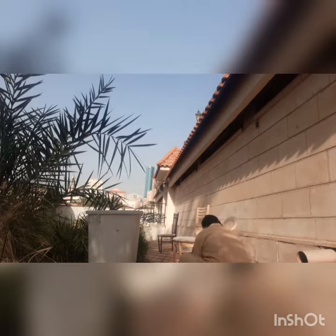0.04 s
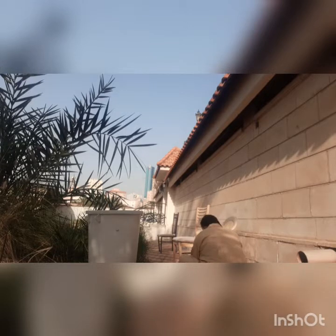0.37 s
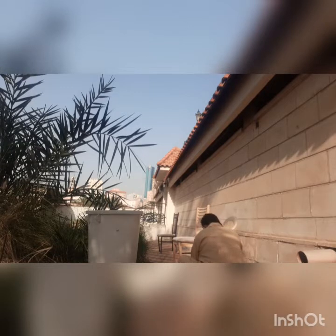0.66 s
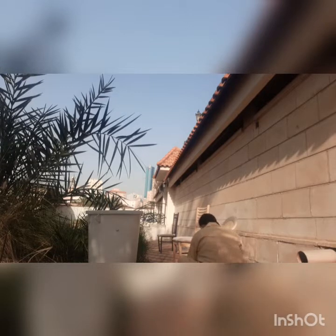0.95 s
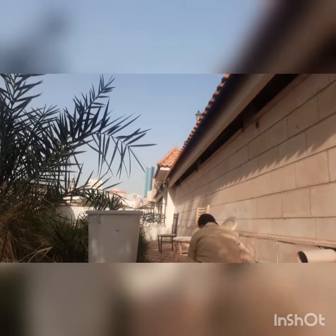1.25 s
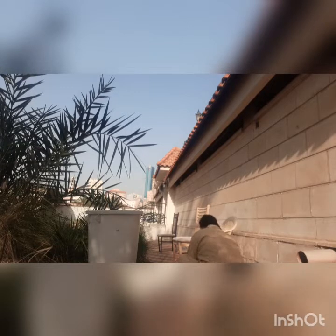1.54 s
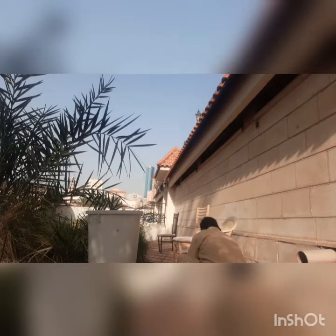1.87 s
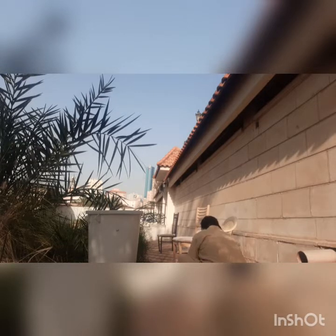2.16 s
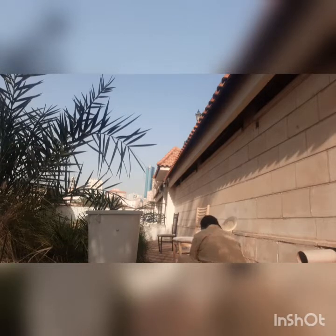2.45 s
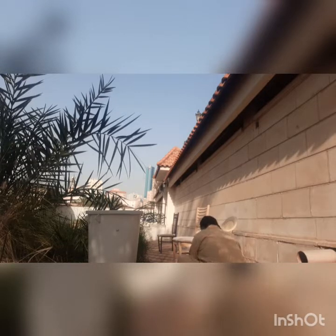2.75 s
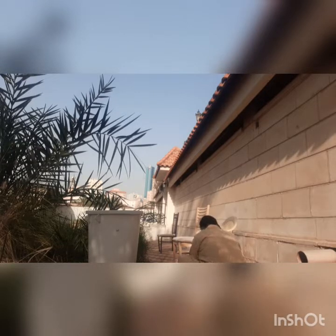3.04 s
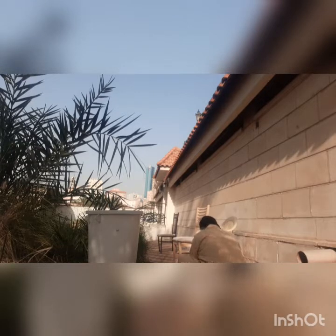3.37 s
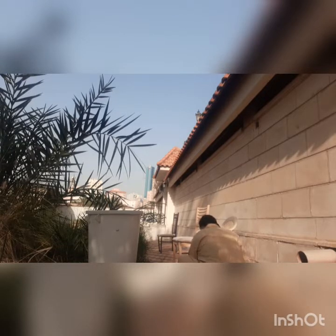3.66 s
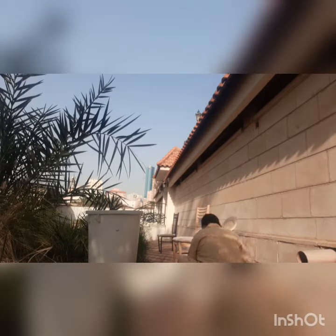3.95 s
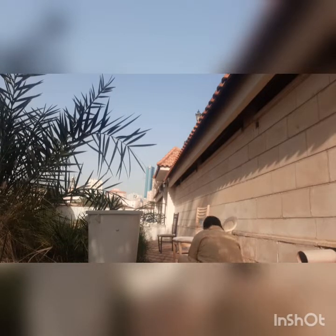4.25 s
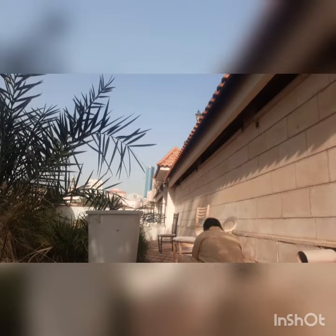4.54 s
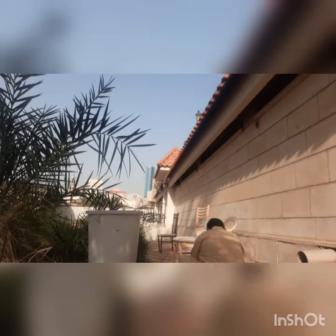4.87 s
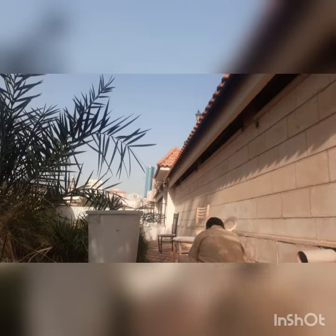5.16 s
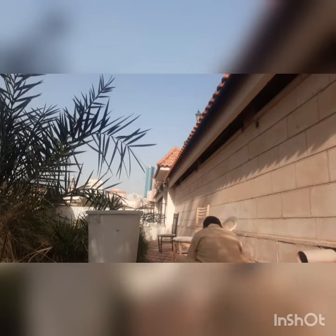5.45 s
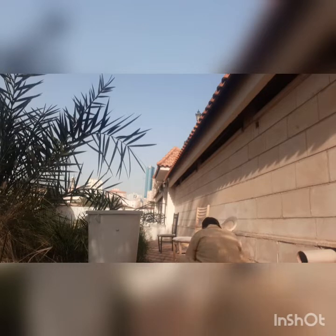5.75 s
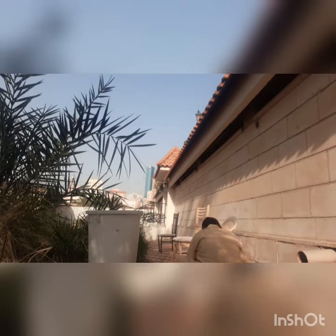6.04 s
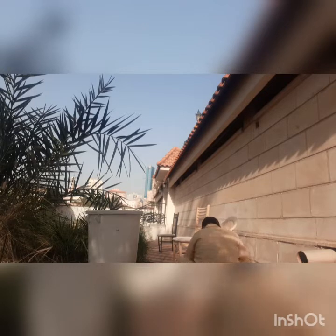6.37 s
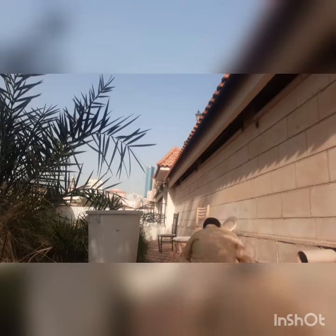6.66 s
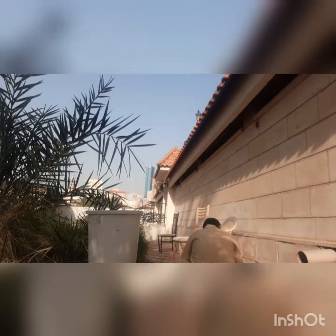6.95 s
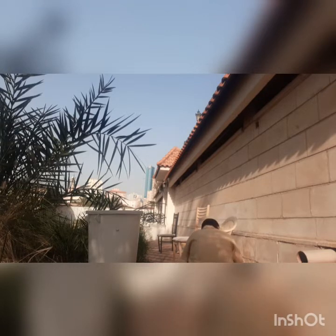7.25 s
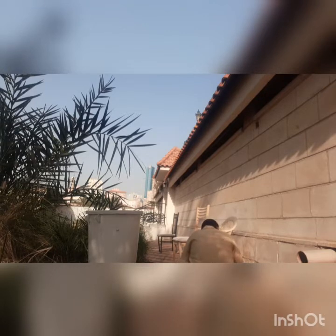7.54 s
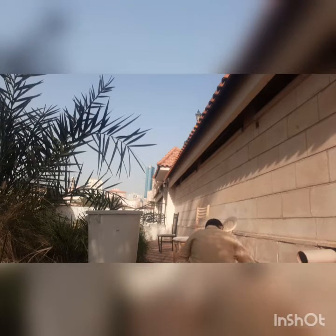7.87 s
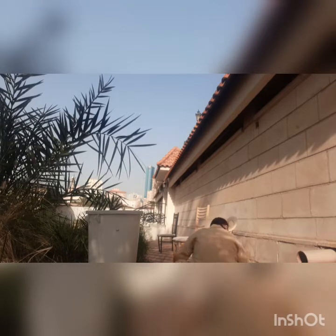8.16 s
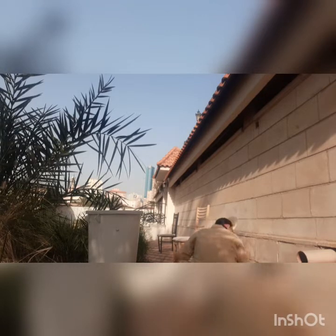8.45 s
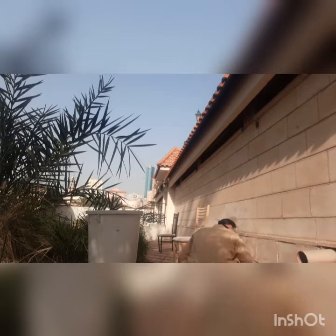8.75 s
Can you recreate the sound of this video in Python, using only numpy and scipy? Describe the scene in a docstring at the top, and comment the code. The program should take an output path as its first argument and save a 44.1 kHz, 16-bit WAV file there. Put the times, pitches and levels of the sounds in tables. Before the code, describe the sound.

Hand shears cut grass and plants on a walled terrace, a few metres from the microphone. Each snip is a crunch of stalks with a steel clack, and sometimes the blades scrape with a brief squeak. The cuts come in two short runs, then more sparsely, with leaves rustling and single stalks snapping between them. Small birds chirp further off, over a cooling unit's low hum and a distant town rumble.

```python
"""Hand shears snip grass and plants on a walled terrace, a few metres from a stereo microphone.
Each cut is a crunch of breaking stalks and a clack of steel; now and then the blades scrape and sing.
Between cuts the hands rustle through leaves and snap single stalks. Further off, small birds chirp
among the houses, over the hum of a cooling unit and the low rumble of the distant town."""
import sys
import numpy as np
from scipy import signal
from scipy.fft import rfft, irfft
from scipy.io import wavfile
from scipy.ndimage import uniform_filter1d

SR = 44100
rng = np.random.default_rng(int(sys.argv[2]) if len(sys.argv) > 2 else 0)


def store_wav(level_fs):
    """Save 16-bit WAV to argv[1]."""
    pcm = np.round(np.clip(np.atleast_2d(level_fs), -1, 1) * 32767)
    wavfile.write(sys.argv[1], SR, pcm.T.astype(np.int16))


N = 396900
TIME = np.arange(N) / SR
LEFT_LAG_SAMPLES = 9  # direct sound reaches the right side of the microphone first


def undb(db):
    """Decibels to gain."""
    return 10 ** (np.asarray(db) / 20)


def unit(x):
    """Scale to an rms of one."""
    return x / np.sqrt(np.mean(x ** 2) + 1e-20)


def fade(t, t60):
    """Exponential decay that loses 60 dB in t60 seconds."""
    return np.exp(-np.log(1000) * t / t60)


def add(track, start_s, sound):
    """Mix a sound into a track."""
    i = max(int(start_s * SR), 0)
    track[..., i:i + sound.shape[-1]] += sound[..., :N - i]


def colour(x, points):
    """Shape a sound by a spectrum of (frequency_hz, gain_db) points."""
    hz, db = np.transpose(points)
    bins_hz = np.maximum(np.fft.rfftfreq(x.shape[-1], 1 / SR), 1)
    gain = undb(np.interp(np.log(bins_hz), np.log(hz), db))
    return irfft(rfft(x) * gain, x.shape[-1])


def band(x, low_hz, high_hz):
    """Band-pass filter."""
    return signal.sosfilt(signal.butter(3, [low_hz, high_hz], "band", fs=SR, output="sos"), x)


def resonance(x, hz, width_hz):
    """One resonant band, with a gain of one at its centre."""
    return signal.lfilter(*signal.iirpeak(hz, hz / width_hz, fs=SR), x)


def walk(rate_hz, size=N):
    """Smooth random wandering with a spread near one."""
    hold = int(SR / rate_hz)
    steps = np.repeat(rng.standard_normal(size // hold + 1), hold)
    return unit(uniform_filter1d(uniform_filter1d(steps, hold), hold)[:size])


def crackle(size, per_s, spread_db):
    """Tiny clicks at random moments, a few of them much larger than the rest."""
    place, sign, strength = rng.random((3, size), dtype=np.float32)
    hit, out = place < per_s / SR, np.zeros(size)
    click_db = spread_db * np.minimum(-np.log(1 - strength[hit]), 4)
    out[hit] = (sign[hit] - .5) * undb(click_db)
    return unit(out)


def space(x, early_db, early_s, near_db, near_t60, far_db, far_t60):
    """Direct sound, a cluster off floor and nearest wall, echoes between walls, then a duller tail."""
    t = TIME[:SR]
    early = rng.standard_normal((2, SR)) * np.clip((early_s - t) / 0.0046, 0, 1)
    near = rng.standard_normal((2, SR)) * fade(t, near_t60)
    tail_spectrum = [(300, -3.5), (1500, -5.5), (4200, -2.0), (7000, -8.0), (16000, -10.0)]
    far = colour(rng.standard_normal((2, SR)), tail_spectrum)
    far *= fade(t, far_t60) * np.minimum(t / 0.018, 1)
    response = undb(early_db) * unit(early) + undb(near_db) * unit(near) + undb(far_db) * unit(far)
    response /= np.sqrt(SR)
    response[0, LEFT_LAG_SAMPLES] += 1
    response[1, 0] += 1
    return signal.fftconvolve(x[None], unit(response) / np.sqrt(SR), axes=1)[:, :N]


def terrace(x):
    """The walls around the hands; each call draws a new pattern of reflections."""
    return space(x, early_db=-2.0, early_s=0.013, near_db=-1, near_t60=0.2, far_db=-21.0, far_t60=0.74)


# Tones of the cooling unit: pitch_hz, level_db
HUM_TONES = [(97, -59), (112, -55.5), (144, -54.5), (191.3, -52)]
# Contour of their shared swell, taken about its mean and scaled by swell_depth: time_s, level_db
HUM_SWELL = [(0.0, -43), (0.22, -42), (2.96, -43), (3.81, -54), (5.24, -49), (6.54, -45.5), (7.6, -49),
             (9.0, -42.5)]


def cooling_unit(waver_db=2.5, drift_hz=.6, swell_depth=0.76):
    """Compressor and fan tones, centred; each wavers a little while all swell together."""
    tones = np.zeros(N)
    for hz, db in HUM_TONES:
        gain = undb(db + waver_db * walk(7.1))
        phase = 2 * np.pi * np.cumsum(hz + drift_hz * walk(5)) / SR
        tones += gain * np.sin(phase)
    time_s, level_db = np.transpose(HUM_SWELL)
    swell_db = swell_depth * np.interp(TIME, time_s, level_db - level_db.mean())
    return np.sqrt(2) * tones * undb(swell_db)


# Spectrum of the town from the terrace: frequency_hz, gain_db
TOWN_SPECTRUM = [(20, -36), (30, -30), (45, -5.5), (75, -2), (130, 0.5), (200, -5.5), (255, -12),
                 (480, -20.5), (700, -22.5), (1450, -34), (3200, -45), (4200, -44.5), (7500, -44.5),
                 (9000, -62), (16000, -65.5)]


def town(level_db=-47.5):
    """A distant, steady rumble with a thin hiss; the bass is centred, the treble wide."""
    mid, side = colour(rng.standard_normal((2, N)), TOWN_SPECTRUM)
    side = colour(side, [(35, -22.5), (70, -18), (150, -8.5), (300, -11.5), (700, -1.0), (2000, 2.5)])
    stereo = np.array([mid + side, mid - side]) / np.std(mid)
    return stereo * undb(level_db + .5 * walk(2.98))


def hand_stroke(swell_s, settle_s, fall_db=22, ease=1.28, roundness=1.32):
    """Envelope of one stroke of the hand: the leaves are pushed aside, then settle."""
    t = TIME[:SR]
    push = np.sin(np.pi / 2 * np.minimum(t / swell_s, 1)) ** ease
    settling = np.maximum(t - swell_s, 0) / settle_s
    return push * undb(-fall_db * settling ** roundness)


def bush_clicks(per_s, spectrum, spread_db=2.6, direct_db=-4):
    """Clicks all over a bush: some come straight to the microphone, the rest by separate paths."""
    straight, left, right = (crackle(N, per_s, spread_db) for _ in range(3))
    direct = np.array([np.roll(straight, LEFT_LAG_SAMPLES), straight])
    return unit(colour(undb(direct_db) * direct + [left, right], spectrum))


# Spectra of crisp leaves and of soft brushing: frequency_hz, gain_db
LEAF_SPECTRUM = [(300, -31), (1000, -22), (2500, -3), (4500, -0.5), (7000, 0.5), (10000, -4), (13000, 1),
                 (16000, -4.5)]
BRUSH_SPECTRUM = [(250, -4.5), (600, -1.5), (1200, 0.5), (2200, 2.5), (3500, -5), (7000, -13), (12000, -41)]
# Hands moving through the plants, levels relative: start_s, swell_s, settle_s, crisp_db, soft_db
HAND_STROKES = [(0.0, 0.02, 0.18, -51, -51.5), (0.24, 0.14, 0.25, -49.5, -45),
                (0.72, 0.079, 0.72, -50, -54), (0.94, 0.22, .27, -51.5, -60),
                (1.659, 0.057, 0.48, -57, -51), (1.86, .07, 0.071, -55.5, -57),
                (2.03, .07, 0.089, -58.5, -55.5), (2.12, 0.14, 0.24, -51, -52),
                (3.46, 0.13, 0.22, -47.5, -49), (3.76, 0.17, 0.19, -55, -58), (4.2, 0.12, 0.18, -55, -55),
                (4.42, 0.11, 0.23, -60.5, -77), (4.66, .1, 0.38, -60.5, -72),
                (4.93, 0.23, 0.32, -52.5, -56.5), (5.42, 0.13, 0.17, -57, -55),
                (5.98, 0.062, 0.42, -52, -50), (6.26, 0.16, 0.48, -48, -55.5),
                (6.63, 0.11, 0.075, -55.5, -68), (6.86, 0.17, 0.16, -58, -55), (7.28, .06, 0.22, -61, -60),
                (7.68, 0.15, .17, -59.5, -70), (7.86, 0.056, 0.51, -62, -80),
                (8.09, 0.061, 0.6, -48.5, -53.5), (8.11, 0.18, 0.29, -68, -51),
                (8.58, 0.37, 0.14, -48.5, -54.5)]


def foliage(leaf_db=1.0, brush_db=-1.5):
    """Leaves slide and tick against each other; stems brush over hands and sleeves."""
    power = np.zeros((2, N))
    for start_s, swell_s, settle_s, crisp_db, soft_db in HAND_STROKES:
        add(power, start_s, np.outer(undb([crisp_db, soft_db]), hand_stroke(swell_s, settle_s)) ** 2)
    stir = undb([[-79.5], [-70]])  # the plants never come quite to rest
    crisp, soft = np.sqrt(power + stir ** 2)
    leaves = bush_clicks(9000, LEAF_SPECTRUM) * crisp * undb(leaf_db + 1.3 * walk(60))
    brush = bush_clicks(5000, BRUSH_SPECTRUM) * soft * undb(brush_db + 2.3 * walk(40))
    return leaves + brush


# Modes of the steel blades: pitch_hz, relative_db, t60_s
BLADE_MODES = [(1020, 2.5, 0.034), (1513, -4, 0.085), (2300, -2.5, 0.092), (3150, -13.5, 0.071),
               (3500, -13, 0.053), (4076, -4.5, .07), (4400, -6, .05), (5370, -8, .06), (5600, -9.5, .08),
               (5420, -4.5, 0.17), (6700, -6, 0.07), (6970, 8, 0.037), (7560, -1.5, 0.1),
               (11000, -8.5, .07), (11650, -2, .07)]


def blade_ring(size, spread_db=2, detune=0.0057):
    """The steel rings in its modes; grip and contact point weight them anew at each stroke."""
    t, ring = TIME[:size], np.zeros(size)
    for hz, db, t60 in BLADE_MODES:
        weight, shift = rng.standard_normal(2)
        mode = np.sin(2 * np.pi * hz * (1 + detune * shift) * t)
        ring += undb(db + spread_db * weight) * mode * fade(t, t60)
    return ring


# Blade dragging on blade: start_s, length_s, rasp_db, squeal_db
BLADE_SCRAPES = [(0.32, 0.01, -37, -64.5), (0.352, 0.016, -36, -55), (0.361, 0.028, -27, -34.5),
                 (3.887, 0.023, -42, -36), (4.634, 0.038, -35.5, -34), (4.668, 0.016, -30, -37),
                 (7.671, 0.024, -36.5, -40.5)]


def blade_scrapes(ring_db=-6, squeal_hz=1538):
    """Edge slides along edge: a rasp through the steel, and stick-slip that sings at one pitch."""
    out, t = np.zeros((2, N)), TIME[:SR // 4]
    for start_s, length_s, rasp_db, squeal_db in BLADE_SCRAPES:
        press = np.sqrt(np.maximum(np.sin(np.pi * np.minimum(t / length_s, 1)), 0))
        slips = crackle(len(t), per_s=5400, spread_db=1.6) * press
        ring = signal.fftconvolve(slips, blade_ring(len(t)))[:len(t)]
        rasp = unit(band(slips, 1300, 13000)) + undb(ring_db) * unit(ring)
        rasp *= np.sqrt(np.mean(press ** 2))
        phase = 2 * np.pi * np.cumsum(squeal_hz * (1 + 0.022 * walk(110, len(t)))) / SR
        squeal = press * np.sqrt(2) * np.sin(phase)
        add(out, start_s, terrace(undb(rasp_db) * rasp + undb(squeal_db) * squeal))
    return out


# Spectrum of breaking stalks: frequency_hz, gain_db
STALK_SPECTRUM = [(200, -11), (330, -7), (490, -11.5), (660, -2), (800, -7.5), (1040, -2), (1220, -8.5),
                  (1600, -2.5), (2400, -2.5), (3200, -5.5), (4200, -2.5), (5200, -6.5), (7400, -3),
                  (9500, -13), (13000, -9.5), (15700, -21.5)]
# Borders of a cut's knock, clack, crunch and fizz bands: edge_hz
BAND_EDGES = [120, 1300, 3200, 8000, 16000]
# Snips a few metres away, levels relative:
# start_s, level_db, stalk_db, knock_hz, clink_hz, bite_s, ring_db
SNIPS = [(0.336, -24.5, -13.5, 694, 7000, 0.0086, -10), (0.745, -30.5, -9, 1140, 4780, 0.0053, -6.5),
         (1.15, -26, -9.5, 1095, 4280, 0.011, -10), (2.592, -28.5, -5, 1081, 4200, 0.0048, -18),
         (2.988, -26, -6.5, 1096, 5300, 0.0046, -15), (3.404, -25.5, -4, 1000, 5450, 0.005, -12),
         (3.876, -27.5, -17.5, 1600, 4120, 0.0091, -11.5), (4.629, -32, -10.5, 1490, 7700, 0.015, -7.5),
         (5.528, -43, -6.5, 990, 4160, 0.0059, -14), (5.938, -23, -12, 1010, 4400, 0.01, -8.5),
         (6.376, -38.5, -4.5, 710, 4100, 0.0097, -6), (7.283, -39.5, -7.5, 820, 4360, 0.0066, -12),
         (7.649, -33.5, -11, 1440, 3420, 0.0066, -4)]


def shear_cuts(gain_db=-8, release_t60=0.0057, thud_db=-10.0, knock_db=2, clink_db=3, fizz_db=-5):
    """The edges bite, stalks fracture in a quick run, and the blades meet with a ring."""
    out, lead = np.zeros((2, N)), SR // 100
    t = TIME[:SR // 4] - lead / SR
    for start_s, level_db, stalk_db, knock_hz, clink_hz, bite_s, ring_db in SNIPS:
        closing_s = 0.0046 + 0.3 * bite_s  # a slow bite also closes slowly
        squeeze = fade(np.maximum(-t, 0), bite_s) * fade(np.maximum(t - closing_s, 0), release_t60)
        force = crackle(len(t), per_s=11000, spread_db=3.7) * squeeze
        crunch = colour(force, STALK_SPECTRUM)
        # where the stalks sit in the jaws decides which damped resonances answer most
        knock = undb(knock_db) * resonance(crunch, knock_hz, width_hz=120)
        clink = undb(clink_db) * resonance(crunch, clink_hz, width_hz=290)
        crunch = crunch + knock + clink
        # thick stalks knock low, fine grass fizzes high
        bands = zip((stalk_db, 0.44 * stalk_db, 0, fizz_db), BAND_EDGES, BAND_EDGES[1:])
        cut = sum(undb(db) * unit(band(crunch, low, high)) for db, low, high in bands)
        thud = undb(stalk_db + thud_db) * unit(band(force, 184, 336))
        steel = np.pad(blade_ring(len(t) - lead), (lead, 0))
        ring = undb(ring_db) * np.std(cut) * unit(steel)
        add(out, start_s + t[0], terrace(undb(level_db + gain_db) * (cut + thud + ring)))
    return out


def bird_note(hz, db, warble, flutter_db=3.0, octave_db=-23):
    """A whistle on a pitch contour; a fast irregular warble and flutter make it hoarse."""
    size = len(hz)
    phase = 2 * np.pi * np.cumsum(hz * (1 + warble * walk(500, size))) / SR
    tone = np.sin(phase) + undb(octave_db) * np.sin(2 * phase)
    flutter = undb(flutter_db * walk(400, size))
    return undb(db) * signal.windows.tukey(size, .15) * unit(tone * flutter)


# Chirps among the houses: start_s, level_db, length_s
BIRD_CHIRPS = [(0.462, -39.5, .135), (1.756, -38, .13), (2.506, -39, 0.098), (2.902, -56, 0.06),
               (4.805, -57.5, 0.057), (7.284, -38.5, 0.12), (7.547, -63, 0.12)]
# Course of one chirp: share_of_length, pitch_hz, gain_db
CHIRP_CONTOUR = [(0, 3700, -23), (.1, 4500, -6), (.19, 5700, -8.5), (.25, 5110, -15), (.28, 4600, -0.5),
                 (.4, 4450, 0), (.5, 3994, -5.5), (.64, 4105, 1), (.82, 3454, -1), (1, 2800, -19)]
# Softer, lower twitters: start_s, level_db, length_s, pitch_hz
BIRD_TWITTERS = [(1.316, -62, .043, 3600), (3.101, -58.5, 0.048, 2090), (3.961, -51, 0.025, 2910),
                 (4.058, -64, 0.02, 2850), (5.368, -65, 0.038, 3090), (5.454, -54.5, 0.038, 2520),
                 (5.556, -50, 0.027, 3130), (6.418, -57, .035, 4750), (8.378, -60, 0.072, 4230),
                 (8.496, -57.5, 0.032, 2450), (8.501, -59.5, 0.04, 4610), (8.729, -59, 0.033, 4320)]


def birds(wall_s=.021, wall_db=-5):
    """Chirps flick up and slide down; twitters are short, husky and falling; a house wall doubles them."""
    out = np.zeros(N)
    share, pitch_hz, gain_db = np.transpose(CHIRP_CONTOUR)
    for start_s, db, length_s in BIRD_CHIRPS:
        progress = np.linspace(0, 1, int(length_s * SR))
        glide_hz = np.interp(progress, share, pitch_hz)
        add(out, start_s, bird_note(glide_hz, db + np.interp(progress, share, gain_db), warble=.045))
    for start_s, db, length_s, hz in BIRD_TWITTERS:
        glide_hz = hz * np.linspace(1.06, .94, int(length_s * SR))
        add(out, start_s, bird_note(glide_hz, db, warble=0.14))
    out += undb(wall_db) * np.interp(TIME - wall_s, TIME, out, left=0)
    return space(out, early_db=10, early_s=0.011, near_db=3.5, near_t60=0.089, far_db=-7, far_t60=0.91)


# Stalks breaking in the hand: start_s, relative_db, tilt_db_per_octave
STALK_SNAPS = [(1.279, -39.5, 3), (1.8144, -38.5, 4.5), (5.4327, -38.5, -2), (5.518, -30.5, -3.5),
               (7.1824, -48, -5), (7.447, -41.5, -1), (7.563, -41.5, -2), (7.595, -46, -1),
               (8.1222, -41.5, 5), (8.8779, -33.5, 1)]


def stalk_snaps(gain_db=7.5, t60=0.03, pivot_hz=3000):
    """Single stalks snap with a short crackle as they are gathered; thin dry ones are brighter."""
    out, t = np.zeros(N), TIME[:SR // 10]
    for start_s, db, tilt in STALK_SNAPS:
        snap = crackle(len(t), per_s=6000, spread_db=2.1) * fade(t, t60)
        spectrum = [(hz, level + tilt * np.log2(hz / pivot_hz)) for hz, level in STALK_SPECTRUM]
        add(out, start_s, undb(db + gain_db) * colour(snap, spectrum))
    return terrace(out)


def scene():
    """Shears and leaves a few metres off by the wall, birds further away, hum and town behind."""
    return shear_cuts() + blade_scrapes() + stalk_snaps() + foliage() + birds() + cooling_unit() + town()


def record(dry, top_hz=15750):
    """The two sides of the microphone each colour the sound their own way; the highest treble is cut."""
    # left minus right: frequency_hz, balance_db
    balance = np.array([(35, -4.0), (65, 3.0), (300, -0.5), (700, 3.0), (1300, 0.0),
                        (2400, 1.5), (4400, -3.5), (8000, 1), (14000, 1.5)])
    left = colour(dry[0], balance * [1, .5])
    right = colour(dry[1], balance * [1, -.5])
    lowpass = signal.ellip(10, .2, 80, top_hz, fs=SR, output="sos")
    return signal.sosfilt(lowpass, np.array([left, right]))


dry = scene()
out = record(dry)
store_wav(out)
```